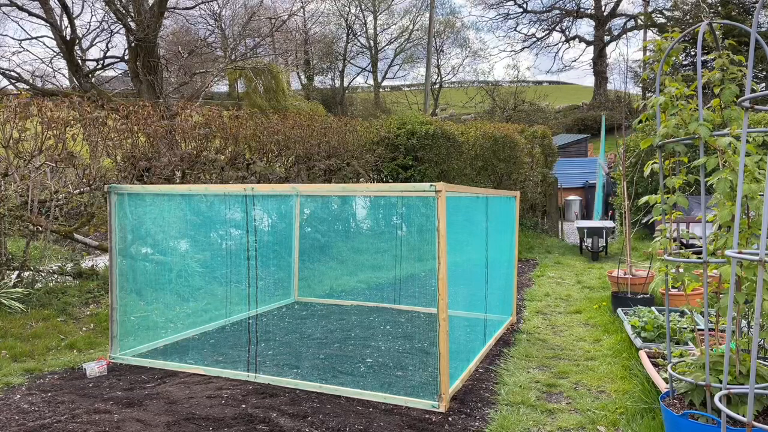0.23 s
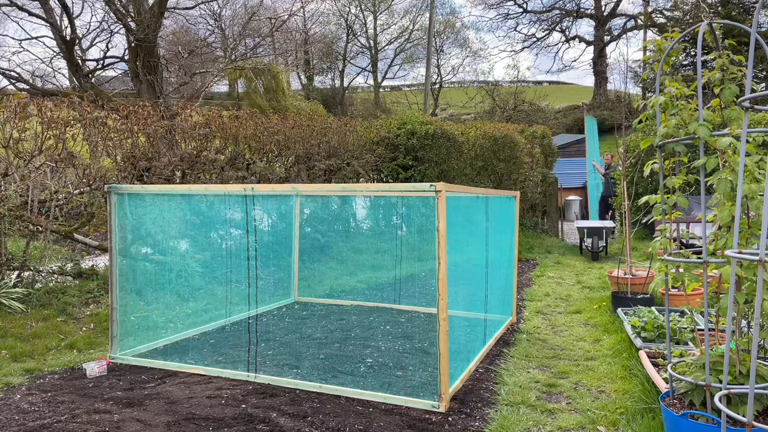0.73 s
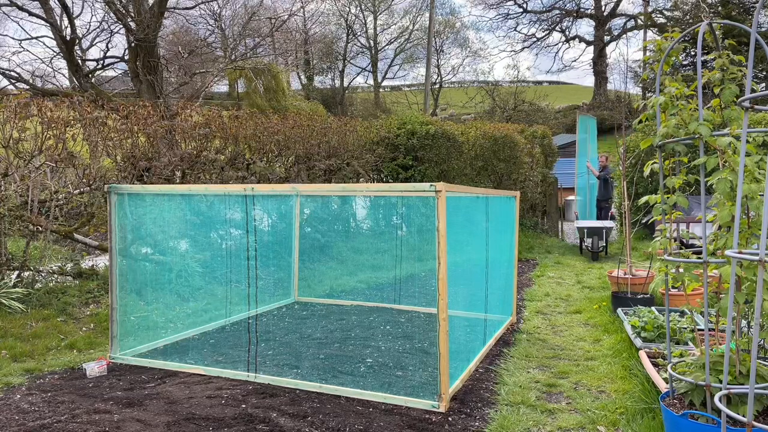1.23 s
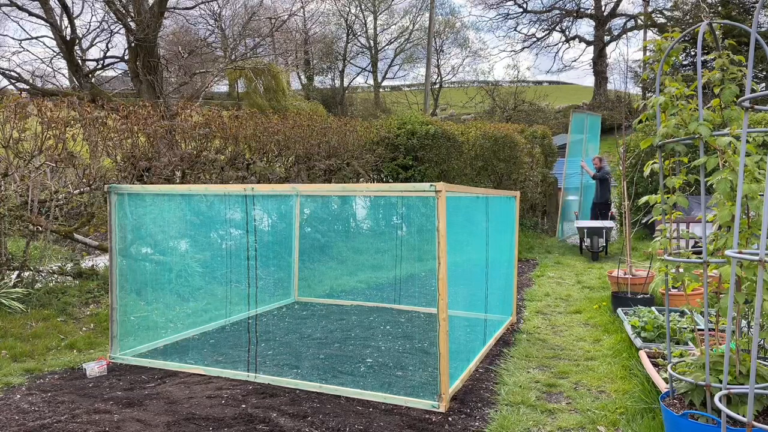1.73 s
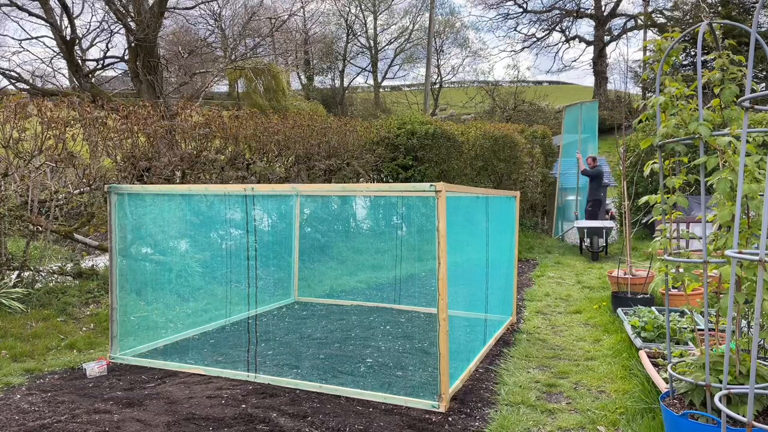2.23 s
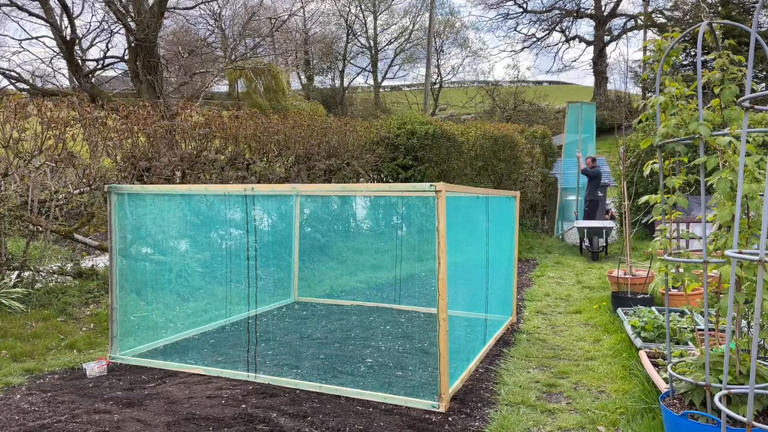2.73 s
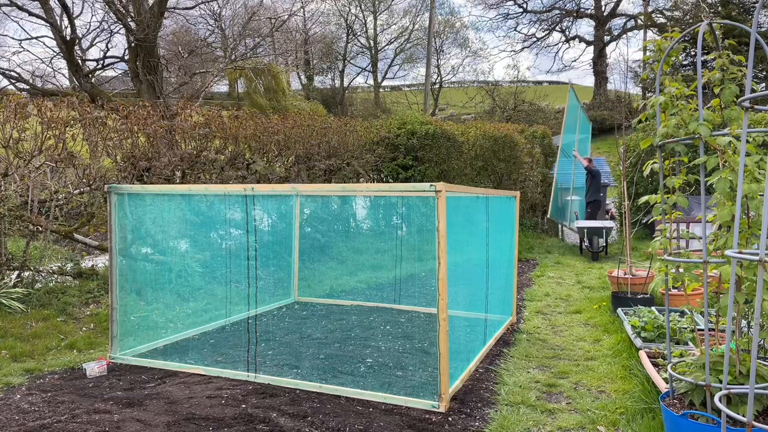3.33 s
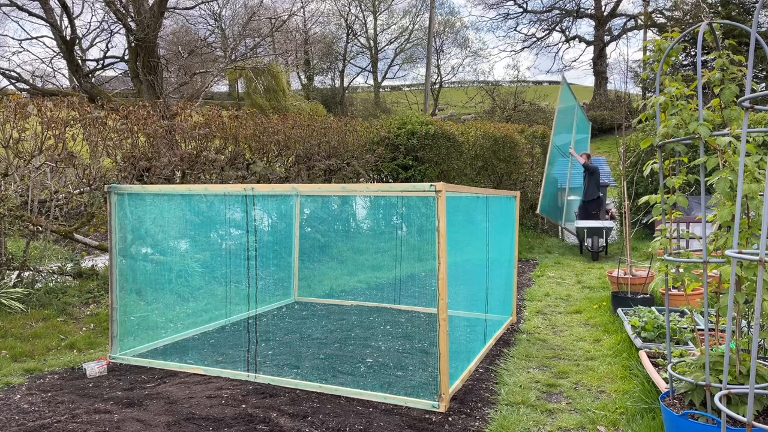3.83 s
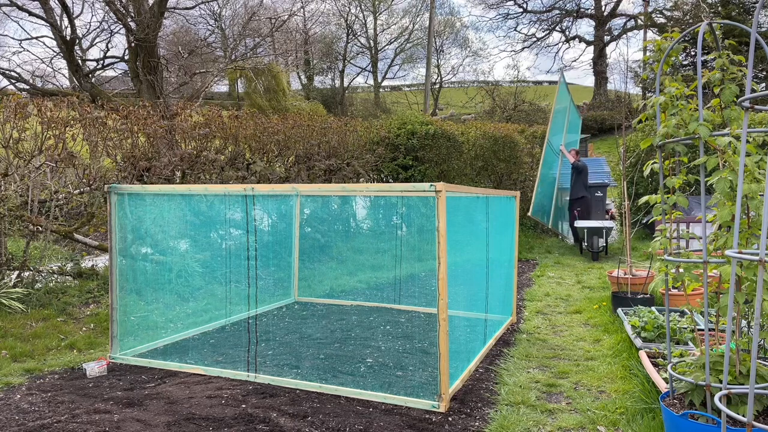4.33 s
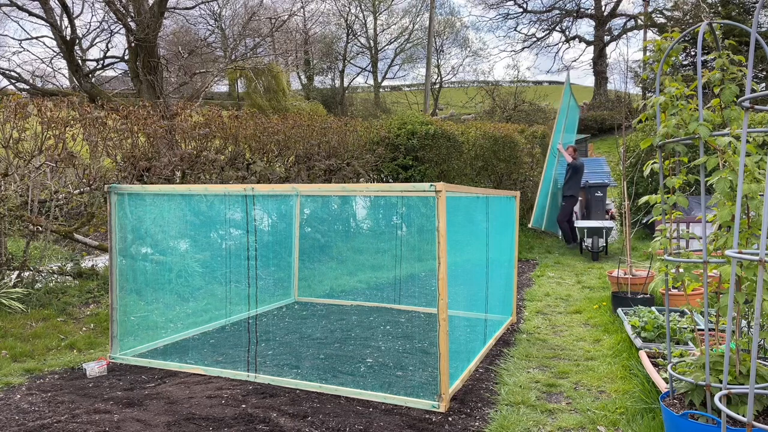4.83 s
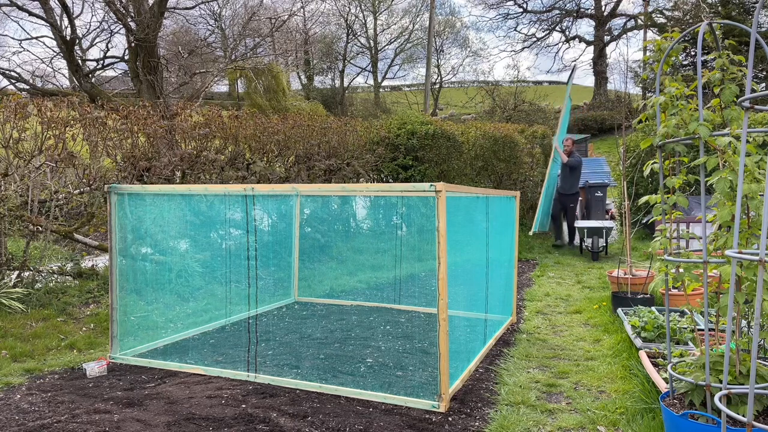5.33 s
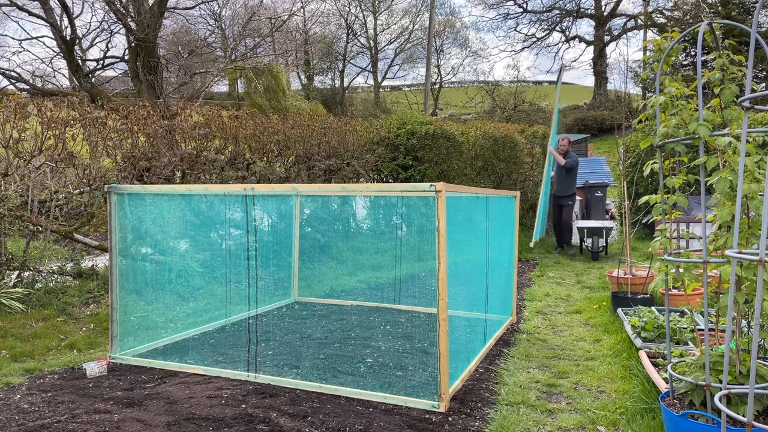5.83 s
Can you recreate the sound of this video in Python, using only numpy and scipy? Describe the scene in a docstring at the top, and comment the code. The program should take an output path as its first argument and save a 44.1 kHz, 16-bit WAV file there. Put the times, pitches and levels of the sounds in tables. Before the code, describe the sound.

Close scuffs, woody ticks and soft thuds on soil, two hoarse bleats beyond a hedge, a distant quavering reply, and thin high birdsong.

```python
"""Sheep beyond a garden hedge

A sheep bleats twice, another answers from far off and small birds chirp over a very quiet wash.
The sheep are rough pulses ringing a throat and mouth; the birds are sliding whistles.
Close by, dry scuffs, ticks, soft thuds and a low rustle come and go, as of someone shifting on soil
and grass: shaped noise and short dying tones. Hedge and trees give the sheep and birds a thin echo."""
import sys
import numpy as np
from scipy import signal
from scipy.fft import rfft, irfft, next_fast_len
from scipy.io import wavfile
from scipy.ndimage import uniform_filter1d, map_coordinates

SR = 44100
rng = np.random.default_rng(int(sys.argv[2]) if len(sys.argv) > 2 else 0)


def wrap_up_sound(samples):
    """Save the sound to the file named by the first command line argument, as 16-bit audio."""
    columns = np.atleast_2d(samples).T
    # keep every value between -1 and 1, then stretch to whole-number steps
    tamed = np.clip(columns, -1, 1)
    steps = np.round(tamed * 32767).astype(np.int16)
    wavfile.write(sys.argv[1], SR, steps)


N = 268128  # length in samples


def amp(db):
    """Turn decibels into a gain."""
    return 10 ** (np.asarray(db) / 20)


def unit(x):
    """Scale a sound to an rms of 1."""
    return x / np.sqrt(np.mean(x ** 2) + 1e-20)


def along(points, hz):
    """Read a curve of (Hz, value) points at any frequency, on a log axis."""
    f, v = np.transpose(points)
    return np.interp(np.log(hz + 1), np.log(f + 1), v)


def curves(rows):
    """Give one value per sample for each column after the time."""
    seconds, *columns = np.transpose(rows)
    return [np.interp(np.arange(N) / SR, seconds, column) for column in columns]


def wobble(rate):
    """Draw a smooth random curve through rate random points a second."""
    steps = np.arange(0, N + 16, 16)
    knots = rng.standard_normal(int(N * rate / SR) + 4)
    curve = map_coordinates(knots, [steps * rate / SR], order=2)
    return np.interp(np.arange(N), steps, curve)


def filtered(x, response):
    """Multiply the spectrum of x by a response that depends on frequency."""
    m = next_fast_len(N + SR // 2)
    hz = np.fft.rfftfreq(m, 1 / SR)
    return irfft(rfft(x, m) * response(hz), m)[:N]


def coloured(x, spectrum):
    """Shape x with a curve of (Hz, dB) points and bring it to an rms of 1."""
    return unit(filtered(x, lambda hz: amp(along(spectrum, hz))))


def resonate(x, modes):
    """Ring x through side-by-side resonances of (Hz, width in Hz, dB)."""
    def response(hz):
        total = 0
        for k, (centre, width, db) in enumerate(modes):
            damping = 1j * hz * width
            # neighbours have opposite signs
            total = total + (-1) ** k * amp(db) * damping / (centre ** 2 - hz ** 2 + damping)
        return total
    return filtered(x, response)


def grains(rate, smooth):
    """Scatter tiny random impacts, rate a second, on a bed of smooth noise."""
    hits = (rng.random(N) < rate / SR) * rng.standard_normal(N)
    return unit(hits) + smooth * rng.standard_normal(N)


def patchy(x, depth_db, size):
    """Make every moment favour pitches of its own, by random gains over time and frequency."""
    z = signal.stft(x, nperseg=size)[2]
    field = rng.standard_normal(z.shape)
    for axis in (0, 1):
        field = uniform_filter1d(field, size=3, axis=axis)
    gain = amp(depth_db * np.clip(unit(field), -2, 2))
    return signal.istft(z * gain, nperseg=size)[1][:N]


def even(x, span):
    """Hold the power of a texture steady over span seconds, leaving its finer grain."""
    power = np.abs(uniform_filter1d(x ** 2, int(span * SR)))
    return x / np.sqrt(power + 1e-9)


def add(track, s, sound):
    """Mix a sound into the track at s seconds."""
    part = track[max(round(s * SR), 0):][:len(sound)]
    part += sound[:len(part)]


def swells(rows, rise, t60, sag_db=0):
    """Gain of (s, hold s, dB) gestures: each rises quickly, sags while held and dies away."""
    power, lead = np.zeros(N), 2 * rise
    for s, hold, db in rows:
        t = np.arange(int((lead + hold + t60) * SR)) / SR - lead
        onset = (2 * np.minimum(t, 0) / rise) ** 2
        decay = np.log(1e6) * np.maximum(t - hold, 0) / t60  # 60 dB over t60 seconds
        level = amp(db - sag_db * np.clip(t / hold, 0, 1))
        add(power, s - lead, np.exp(-onset - decay) * level ** 2)
    return np.sqrt(power)


# How loud the background wash is. Each row: time in seconds, level in dB.
AIR_LEVEL = [(0, -78.5), (.6, -69), (1.1, -78.5), (1.5, -74), (2.8, -70.5), (3.4, -77), (3.9, -78),
             (4.3, -82.5), (5.1, -73), (5.7, -73), (6.08, -78)]
# The tone colour of the wash. Each row: frequency in Hz, level in dB.
AIR_COLOUR = [(120, -42.5), (200, -21.5), (521, -22), (1490, -9), (1790, -13), (2120, -10), (3320, -15),
              (4450, -12.5), (6860, -26), (8000, -42.5), (10400, -81), (17600, -120)]


def air(waver_db=1.5):
    """Distant birdsong and moving air blur into a faint wash of patchy noise."""
    db, = curves(AIR_LEVEL)
    wash = coloured(patchy(rng.standard_normal(N), depth_db=6.0, size=1024), AIR_COLOUR)
    return amp(db + waver_db * wobble(41)) * wash


# Soft low rustles. Each row: start in seconds, hold in seconds, level in dB.
RUSTLES = [(.19, .17, -70.5), (.42, 0.091, -64), (.745, 0.069, -56), (.84, 0.17, -65), (.99, 0.072, -64),
           (1.32, 0.032, -62.5), (1.4, 0.014, -59), (1.57, 0.2, -65), (1.78, 0.069, -54.5),
           (1.895, 0.097, -51.5), (2.085, 0.085, -58), (2.19, 0.068, -46), (2.26, 0.083, -53),
           (2.38, .07, -67.5), (2.49, 0.061, -59.5), (2.63, 0.1, -57), (2.74, .1, -66.5), (2.87, 0.17, -73),
           (3.05, 0.03, -67.5), (3.14, 0.057, -56), (3.235, 0.11, -55.5), (3.35, 0.02, -65),
           (3.57, .12, -86.5), (3.83, 0.23, -66), (4.12, .1, -79.5), (4.746, .07, -66.5),
           (4.872, .08, -68.5), (5.2, 0.19, -62), (5.42, 0.099, -66.5), (5.535, 0.012, -58),
           (5.72, 0.31, -73)]
# The muffled colour of a rustle. Each row: frequency in Hz, level in dB.
RUSTLE_COLOUR = [(30, -26.5), (80, -21.5), (140, -5.5), (220, 1), (330, 2), (430, -1.5), (560, -10.5),
                 (750, -24.5), (1500, -53.5)]


def rustles(rise_s=0.022, t60_s=0.11, sag_db=3.5, rest_db=-97.5):
    """Each movement gives a muffled, lumpy rustle of soft bumps; a trace stirs in between."""
    bumps = patchy(grains(rate=400, smooth=0.95), depth_db=4.0, size=1024)
    movement = swells(RUSTLES, rise_s, t60_s, sag_db) + amp(rest_db)
    return movement * even(coloured(bumps, RUSTLE_COLOUR), span=0.066)


# Soft thuds. Each row: start in seconds, level in dB, pitch in Hz.
THUDS = [(0.262, -41, 155), (1.79, -29.5, 561), (2.183, -27.5, 244), (2.184, -24, 432.5),
         (3.047, -45.5, 173), (3.887, -49, 157.6), (3.954, -44.5, 233), (4.008, -44.5, 199),
         (4.48, -65, 287)]


def thuds(t60_s=0.051, attack_s=0.0041):
    """A soft bump is a few low cycles that die at once."""
    out, t = np.zeros(N), np.arange(SR // 6) / SR
    for s, db, hz in THUDS:
        tone = np.sin(2 * np.pi * hz * t + rng.uniform(0, 2 * np.pi))
        add(out, s, amp(db - 60 * t / t60_s) * (1 - np.exp(-t / attack_s)) * tone)
    return out


# Dry scuffs. Each row: start in seconds, hold in seconds, soil level in dB, stalk level in dB.
SCUFFS = [(0.154, 0.027, -61, -62), (0.18, .008, -48.5, -44), (0.237, 0.02, -45, -53.5),
          (0.3, 0.041, -60, -87), (0.737, .015, -39, -42), (0.761, 0.019, -34, -29),
          (0.81, 0.011, -32.5, -40), (0.855, 0.061, -43.5, -61), (1.306, 0.032, -41, -50),
          (1.731, .05, -61.5, -54), (1.786, 0.0074, -58, -38.5), (1.801, 0.0061, -53.5, -35.5),
          (1.832, 0.037, -49, -41.5), (1.866, 0.099, -49.5, -36), (1.972, 0.049, -55.5, -45),
          (2.086, 0.23, -60, -50), (2.196, 0.0047, -41.5, -32), (2.284, 0.21, -61.5, -58.5),
          (2.673, 0.021, -55, -48.5), (2.72, 0.054, -66.5, -60.5), (3.272, 0.021, -65, -79.5),
          (4.734, 0.052, -69, -77), (5.204, 0.14, -59, -69), (5.449, 0.098, -63.5, -75.5),
          (5.527, 0.018, -57.5, -75.5)]
# The colour of scuffed soil, also the grit in a tick. Each row: frequency in Hz, level in dB.
SOIL_COLOUR = [(150, -48.5), (250, -26.5), (360, -16.5), (451, -15.5), (624, -4), (716, 0), (1040, -1.5),
               (1140, 2), (2270, -5.5), (5000, -30.5), (6500, -52), (11000, -120)]
# The colour of dry stalks, also the snap of a tick. Each row: frequency in Hz, level in dB.
STALK_COLOUR = [(1500, -36), (3000, -6), (4000, -1), (5000, -4), (6200, 1), (7100, -6), (8000, -22)]


def scuffs(rise_s=.012, soil_t60_s=0.22, stalk_t60_s=0.09, sag_db=3.5, clump_db=2.5, patch_db=4):
    """Each scuff crushes soil and dry stalks: clumped grains that swell and die away."""
    soil_rows = [(s, hold, db) for s, hold, db, _ in SCUFFS]
    stalk_rows = [(s, hold, db) for s, hold, _, db in SCUFFS]
    soil_gain = swells(soil_rows, rise_s, soil_t60_s, sag_db) * amp(clump_db * wobble(150))
    stalk_gain = swells(stalk_rows, rise_s, stalk_t60_s, sag_db) * amp(clump_db * wobble(220))
    soil = coloured(patchy(grains(rate=700, smooth=0.93), patch_db, size=512), SOIL_COLOUR)
    stalks = coloured(patchy(grains(rate=4500, smooth=0.94), patch_db, size=256), STALK_COLOUR)
    return soil_gain * even(soil, span=0.018) + stalk_gain * even(stalks, span=0.015)


# Twig-like ticks. Each row: start in seconds, overall level in dB, brightness of the snap in dB,
# pitch in Hz around which the knock's partials lie.
TICKS = [(0.124, -47, -9, 2100), (0.528, -48, 2, 2080), (1.214, -28.5, -32, 1303),
         (1.253, -43.5, -40, 1240), (1.284, -31.5, -5, 1535), (1.394, -25.5, -26, 1187),
         (1.501, -49.5, 1, 1600), (3.041, -43, -17, 1443), (3.562, -46, -5, 2260), (3.691, -54, 4, 2200),
         (3.952, -48, -15.5, 588), (4.166, -44, -21, 1960), (4.701, -41, -21, 1386)]


def ticks(knock_t60_s=0.029, snap_t60_s=0.044, knock_db=-7, snap_db=-7, attack_s=0.00091):
    """A small contact gives a short, gritty woody knock with a bright snap."""
    partials = [(.88, -6.5), (1.06, 3.5), (1.35, -7.5), (1.8, -12.5)]  # (ratio to the pitch, dB)
    out, t = np.zeros(N), np.arange(SR // 8) / SR
    snaps = coloured(rng.standard_normal(N), STALK_COLOUR)
    grit = coloured(rng.standard_normal(N), SOIL_COLOUR)
    for s, db, treble_db, hz in TICKS:
        at = round(s * SR) + np.arange(len(t))
        knock = .5 * grit[at]
        for ratio, partial_db in partials:
            phase = rng.uniform(0, 2 * np.pi)
            knock = knock + amp(partial_db) * np.sin(2 * np.pi * hz * ratio * t + phase)
        # the brighter the snap, the less of the blow goes into the knock
        share = np.sqrt(np.clip(1 - amp(treble_db) ** 2, .05, 1))
        sound = knock * share * amp(knock_db - 60 * t / knock_t60_s)
        sound += snaps[at] * amp(snap_db + treble_db - 60 * t / snap_t60_s)
        add(out, s, amp(db) * sound * (1 - np.exp(-t / attack_s)))
    return out


# Bird notes. Each row: start in seconds, length in seconds, start pitch in Hz, end pitch in Hz,
# level in dB at the start of the note. The pitches and levels waver a little.
CHIRPS = [ (0.052, 0.047, 2817, 3216, -54.5), (0.419, 0.076, 4170, 4440, -63.5),
          (0.677, 0.027, 4080, 4630, -53.5), (1.082, 0.03, 3320, 4270, -68.5),
          (1.181, 0.036, 4070, 5400, -65), (1.423, .014, 4060, 4900, -54),
          (1.445, 0.014, 3990, 5040, -53.5), (1.552, 0.16, 5750, 5200, -66.5),
          (1.617, 0.034, 4070, 4440, -46.5), (2.559, 0.017, 3900, 4290, -56.5),
          (2.672, .034, 3180, 3010, -44.5), (2.715, .04, 3030, 3120, -53.5),
          (2.876, 0.042, 4190, 4456, -43), (2.966, .05, 3840, 3827, -34.5), (2.97, 0.11, 4030, 4210, -40),
          (3.02, 0.092, 3950, 3800, -46), (3.091, .08, 4223, 4450, -48.5), (3.169, 0.069, 3370, 3596, -42),
          (3.177, 0.059, 2780, 3310, -45), (3.204, 0.064, 3555, 3855, -36.5),
          (3.253, 0.035, 4740, 4420, -47.5), (3.275, 0.064, 3760, 3850, -48.5),
          (3.337, 0.063, 3260, 3966, -47.5), (3.393, 0.031, 4100, 4310, -49),
          (4.341, 0.042, 2990, 3000, -54), (4.37, 0.059, 3515, 3800, -44.5),
          (4.395, 0.017, 3880, 3480, -44), (4.402, 0.023, 3400, 4460, -45.5),
          (4.414, 0.028, 4220, 3530, -52.5), (4.455, 0.029, 3240, 3675, -45.5),
          (4.472, .012, 3710, 3430, -47), (4.49, 0.031, 3374, 3290, -47), (4.567, .035, 3420, 3586, -47),
          (4.629, 0.016, 3310, 3360, -50.5), (4.659, 0.022, 3860, 3675, -46.5),
          (4.699, 0.035, 3480, 3497, -53), (5.466, 0.025, 3345, 4274, -46.5),
          (5.481, 0.064, 4330, 4347, -45), (5.701, 0.058, 4280, 4280, -44),
          (5.731, 0.03, 3970, 5820, -57.5), (5.763, 0.053, 4260, 4260, -52), (5.853, 0.02, 3630, 4110, -42),
          (5.941, 0.029, 3630, 5380, -45.5), (5.985, 0.034, 4170, 4420, -50),
          (6.058, 0.023, 3550, 4120, -59.5)]


def birds(flutter_db=2, waver=.017, edge_s=.009, fade_db=7.5):
    """Each note is a pure whistle that slides quickly, settles on its end pitch and weakens."""
    song, drift, flutter = np.zeros(N), waver * wobble(260), flutter_db * wobble(130)
    for s, length, start_hz, end_hz, db in CHIRPS:
        t = np.arange(int(length * SR)) / SR
        u = t / length  # progress through the note, 0 to 1
        at = min(int(s * SR), N - len(t)) + np.arange(len(t))
        hz = (end_hz + (start_hz - end_hz) * (1 - u) ** 2) * (1 + drift[at])
        gate = np.sin(np.pi / 2 * np.clip(np.minimum(t, length - t) / edge_s, 0, 1)) ** 2
        whistle = np.sqrt(2) * np.sin(2 * np.pi * np.cumsum(hz) / SR)
        add(song, s, gate * amp(db - fade_db * u + flutter[at]) * whistle)
    return song


# The throat's resonances at the middle pitch. Each row: frequency in Hz, width in Hz, level in dB.
THROAT = [(673.4, 58, -10), (1559, 72, 5)]


def bleat(pitch_rows, opening, mouth_modes, roughness):
    """Sharp, uneven glottal pulses ring the throat and open mouth, at a steady level."""
    jitter, waver, rasp, shimmer_db, lift = .034, .018, .27, 1.8, .35
    pitch, = curves(pitch_rows)
    n = np.arange(N)
    # the voice is steadier while the mouth is half shut
    unsteady = 1 + roughness * jitter * np.minimum(opening, 1) * wobble(110)
    phase = np.cumsum(pitch * unsteady) / SR
    # the larynx rises with the pitch and lifts every resonance: the throat runs on a stretched clock
    middle_pitch = np.median(np.transpose(pitch_rows)[1])
    clock = np.cumsum((pitch / middle_pitch) ** lift * (1 + roughness * waver * wobble(24)))
    phase = np.interp(n, clock, phase)
    pulses = unit(np.diff(np.floor(phase), prepend=0)) * amp(shimmer_db * wobble(150))
    # air hisses through the folds once a cycle
    hiss = unit(np.exp(-3 * (phase % 1)) * rng.standard_normal(N))
    source = pulses + roughness * rasp * hiss
    # back from the stretched clock to ordinary time
    throat = np.interp(clock, n, resonate(source, THROAT))
    mouth = np.interp(clock, n, resonate(source, mouth_modes))
    # distance takes away the treble, and moving air makes the partials flicker
    voice = filtered(throat + opening * mouth, lambda hz: 1 / np.sqrt(1 + (hz / 3500) ** 8))
    return even(patchy(voice, depth_db=2, size=1024), span=.023)


# The far sheep's pitch through one long call, before roughness. Each row: time in seconds, pitch in Hz.
FAR_PITCH = [(4.08, 160.1), (4.17, 174.2), (4.36, 181.8), (4.55, 168.4), (4.8, 176.1), (5.18, 156.2)]
# The far call's surges, before the quaver. Each row: start in seconds, hold in seconds, level in dB.
FAR_SURGES = [(4.13, .14, -71), (4.29, .14, -68.5), (4.49, .2, -72), (4.74, 0.041, -63), (4.88, .1, -71.5),
              (5.02, 0.029, -68.5)]
# The far sheep's mouth resonances at the middle pitch. Each row: frequency in Hz, width in Hz, level in dB.
FAR_MOUTH = [(2060, 190, 6.5), (2977, 430, 3.5)]


def far_bleat(rise_s=0.038, t60_s=0.4, open_db=11.5, ground_hz=1300):
    """One long, clearer call whose loudness and mouth opening quaver together."""
    quaver_db, quaver_hz, quaver_peak_s = 3, 14.6, 4.355
    t = np.arange(N) / SR
    quaver = amp(quaver_db * np.cos(2 * np.pi * quaver_hz * (t - quaver_peak_s)))
    voice = bleat(FAR_PITCH, amp(open_db) * quaver, FAR_MOUTH, roughness=.55)
    call = swells(FAR_SURGES, rise_s, t60_s) * quaver * voice
    # the long path over soft ground thins out the low partials
    return filtered(call, lambda hz: hz ** 3 / np.sqrt(hz ** 6 + ground_hz ** 6))


# The near sheep's pitch climbs through its first bleat and sags through the second, before roughness.
# Each row: time in seconds, pitch in Hz.
NEAR_PITCH = [(1.485, 128), (1.589, 142.8), (1.7, 168.1), (1.74, 148.2), (2.02, 152.9), (2.11, 164.1),
              (2.27, 160.2), (2.36, 148.4), (2.46, 143.1), (2.55, 132)]
# Each bleat comes in surges of effort.
# Each row: start in seconds, hold in seconds, level in dB, mouth opening in dB.
NEAR_SURGES = [(1.494, .012, -52.5, 1), (1.52, 0.024, -42.5, 12.5), (1.59, 0.037, -36, 2.5),
               (1.651, 0.01, -31.5, 0.5), (1.681, 0.019, -33, -1), (2.034, 0.014, -46, -2),
               (2.055, 0.0098, -36, 0.5), (2.09, 0.13, -37.5, -6), (2.227, .08, -43.5, -8),
               (2.327, .015, -43, 6.5), (2.355, 0.043, -33.5, 5.5), (2.455, 0.024, -37, 7.5)]
# The near sheep's mouth resonances at the middle pitch. Each row: frequency in Hz, width in Hz, level in dB.
NEAR_MOUTH = [(2087, 280, -4), (2253, 177, 1), (2670, 192, -5), (3470, 640, -17.5)]


def near_bleats(rise_s=.011, voice_t60_s=.095, mouth_t60_s=.085):
    """Every surge of effort swells the voice and opens the mouth."""
    effort_rows = [(s, hold, db) for s, hold, db, _ in NEAR_SURGES]
    mouth_rows = [(s, hold, db + open_db) for s, hold, db, open_db in NEAR_SURGES]
    effort = swells(effort_rows, rise_s, voice_t60_s)
    mouth = swells(mouth_rows, rise_s, mouth_t60_s)
    return effort * bleat(NEAR_PITCH, mouth / (effort + 1e-6), NEAR_MOUTH, roughness=1.0)


def scatter(x, spread, count=30):
    """Many faint copies off nearby branches, arriving within spread seconds."""
    delays = rng.uniform(0.036, 1, count)  # as a share of the spread
    gains = rng.choice([-1, 1], count) * np.exp(-2 * delays)
    paths = np.bincount((delays * spread * SR).astype(int), gains)
    return signal.fftconvolve(x, paths / np.linalg.norm(paths))[:N]


# How long the echo lasts. Each row: frequency in Hz, time to fall by 60 dB in seconds.
TREES = [(200, 0.3), (800, 0.64), (2000, 0.34), (4000, 1), (8000, 0.13)]


def echo(x, delay):
    """Scattered return from hedge and trees; each frequency dies at its own speed."""
    hz, t, z = signal.stft(rng.standard_normal(SR), SR, nperseg=256)
    fade = amp(-60 * t / along(TREES, hz)[:, None])
    tail = signal.istft(z * fade, SR, nperseg=256)[1]
    late = np.pad(x, (int(delay * SR), 0))
    return signal.fftconvolve(late, tail / np.linalg.norm(tail))[:N]


# The colour of the near bleat's echo. Each row: frequency in Hz, level in dB.
HEDGE = [(400, -12.5), (720, 6), (1050, -9), (1600, -8), (2100, -6.5), (2900, 3), (4500, -1)]


def scene():
    """Sheep and birds sound through the trees; the rustling is near and dry."""
    sheep, song = near_bleats(), birds()
    sheep = .92 * sheep + .4 * scatter(sheep, spread=.02)
    # the hedge returns the first throat resonance most strongly
    hedge_echo = filtered(echo(sheep, delay=0.018), lambda hz: amp(along(HEDGE, hz)))
    sheep = sheep + amp(-8) * hedge_echo
    far_sheep = scatter(far_bleat(), spread=0.028)
    # copies off the branches beat against each gliding note
    song = .84 * song + .54 * scatter(song, spread=.075)
    song = song + amp(-26.5) * echo(song, delay=0.015)
    nearby = scuffs() + ticks() + thuds() + rustles()
    return (air() + nearby + song + far_sheep + sheep)[None]


def record(dry, top_hz=8160, rolloff_hz=7300):
    """The recorder rolls off in the treble and keeps nothing above its band limit."""
    return filtered(dry[0], lambda hz: (hz < top_hz) / np.sqrt(1 + (hz / rolloff_hz) ** 40))[None]


dry = scene()
out = record(dry)
wrap_up_sound(out)
```